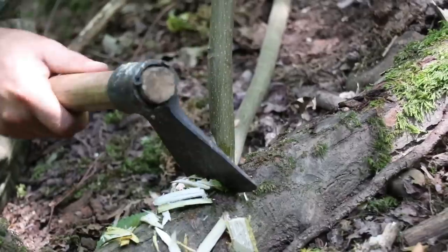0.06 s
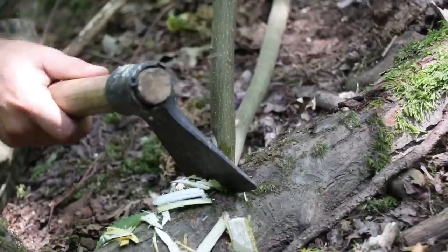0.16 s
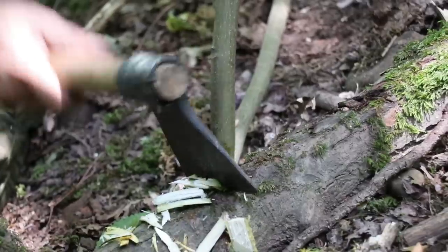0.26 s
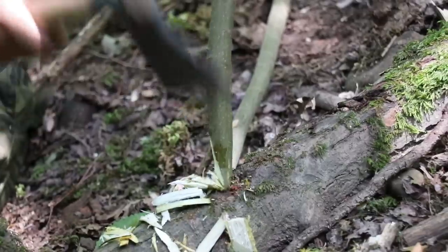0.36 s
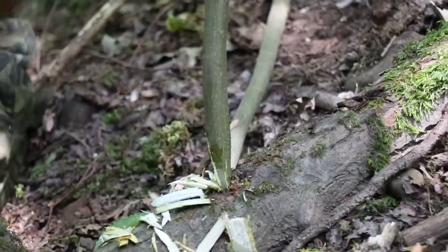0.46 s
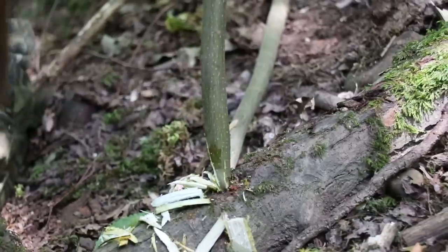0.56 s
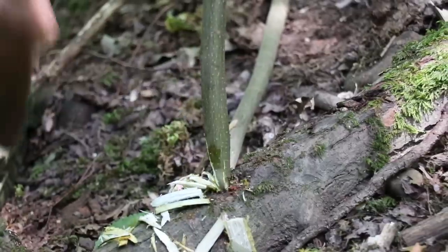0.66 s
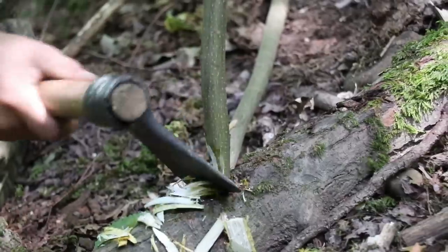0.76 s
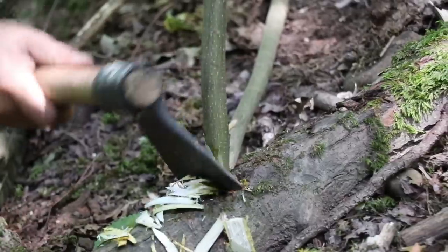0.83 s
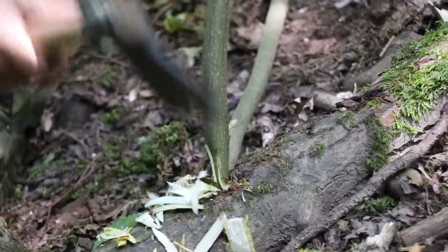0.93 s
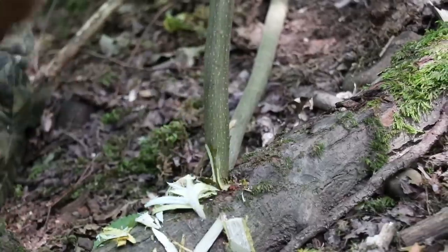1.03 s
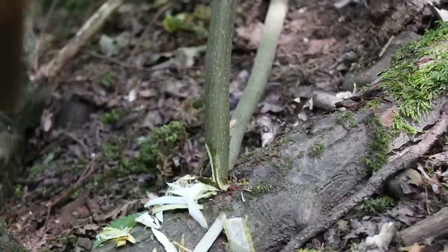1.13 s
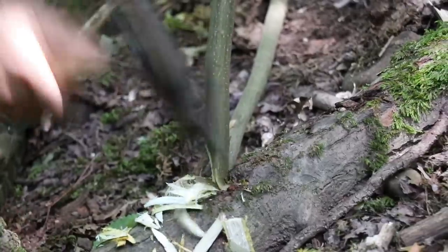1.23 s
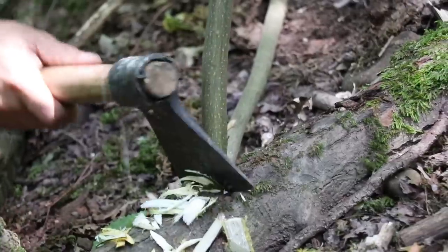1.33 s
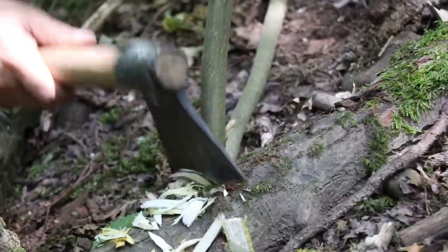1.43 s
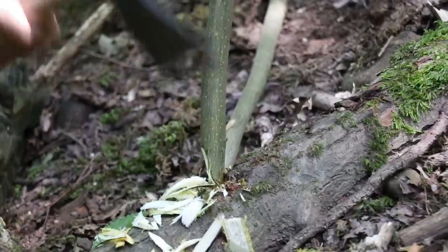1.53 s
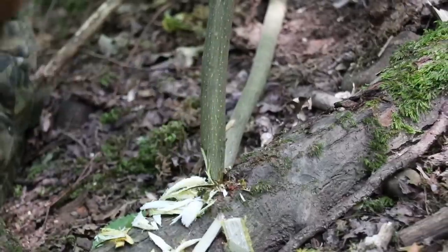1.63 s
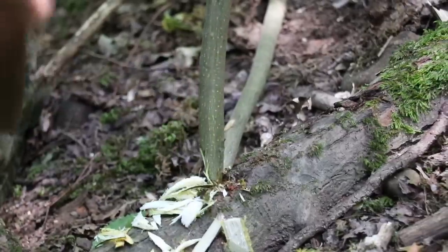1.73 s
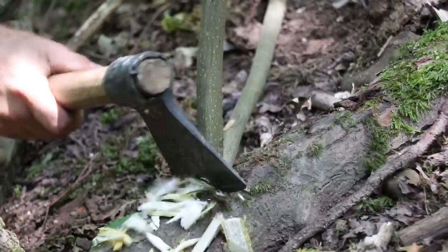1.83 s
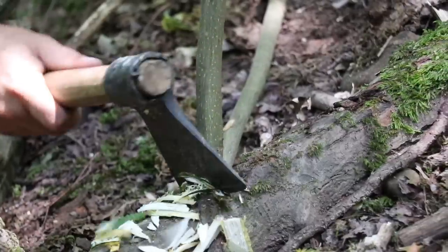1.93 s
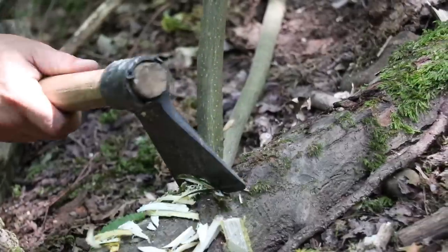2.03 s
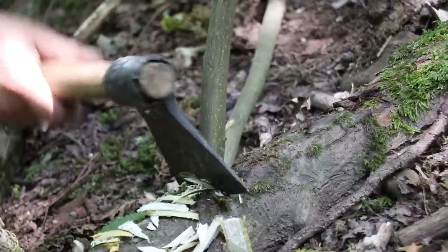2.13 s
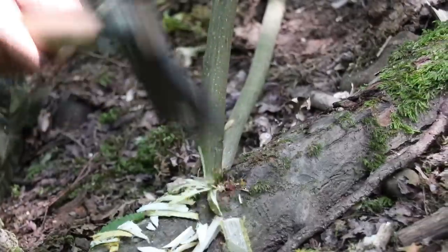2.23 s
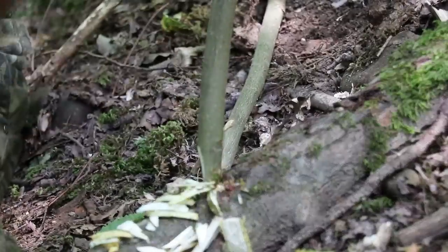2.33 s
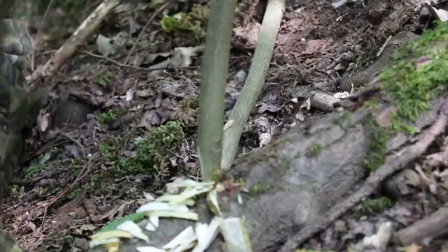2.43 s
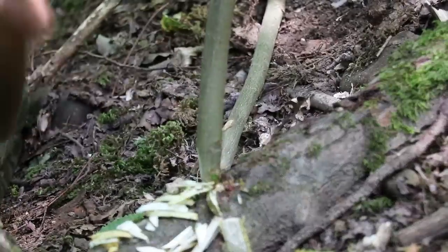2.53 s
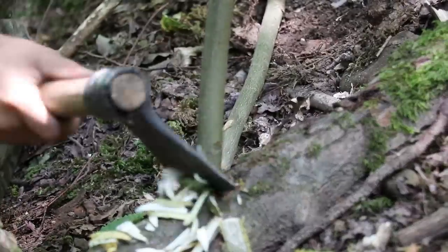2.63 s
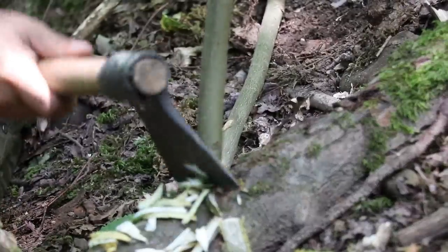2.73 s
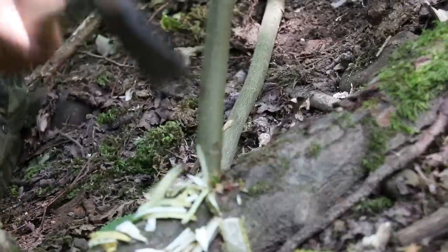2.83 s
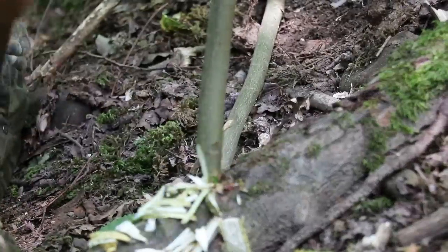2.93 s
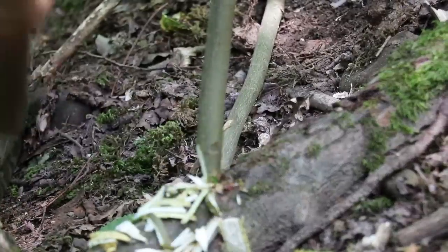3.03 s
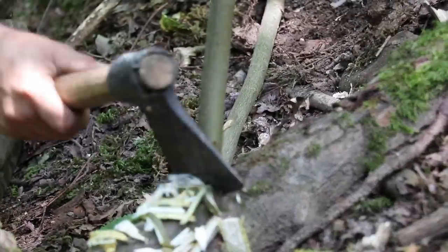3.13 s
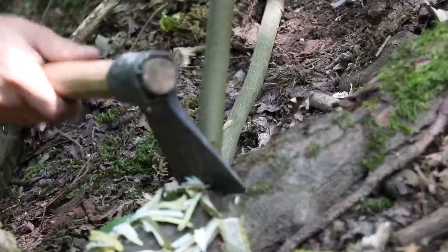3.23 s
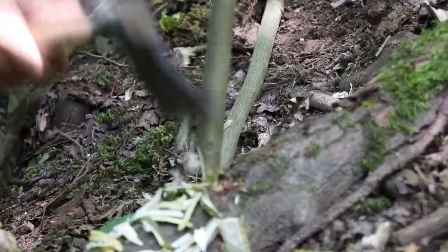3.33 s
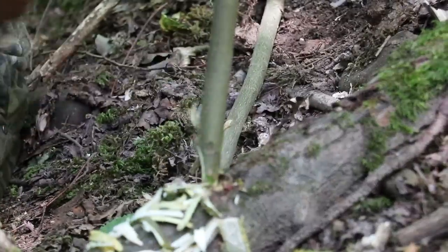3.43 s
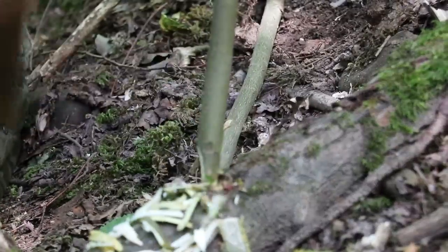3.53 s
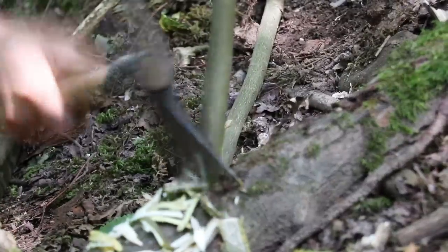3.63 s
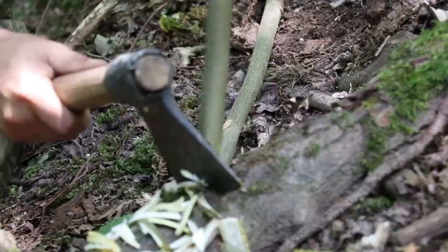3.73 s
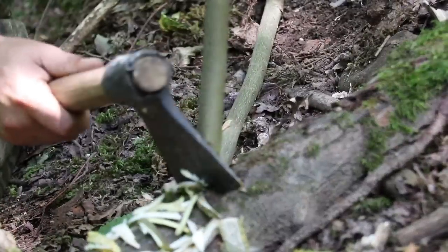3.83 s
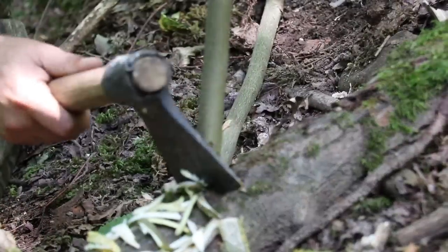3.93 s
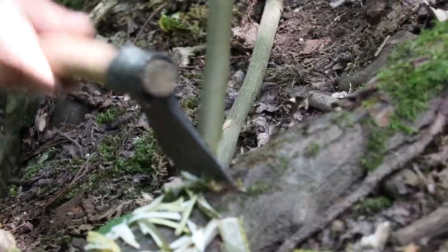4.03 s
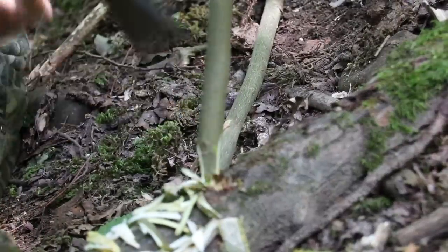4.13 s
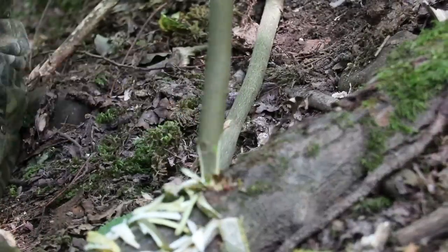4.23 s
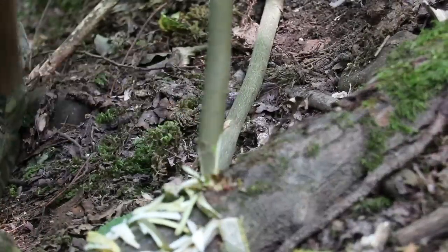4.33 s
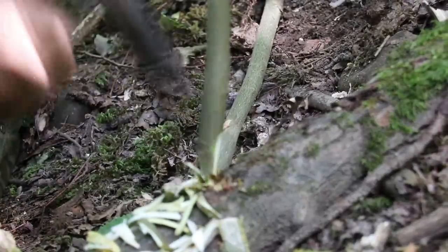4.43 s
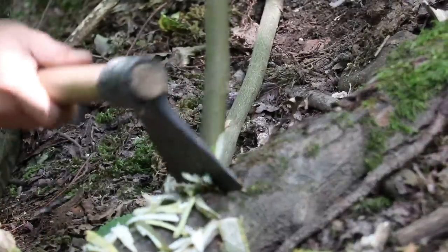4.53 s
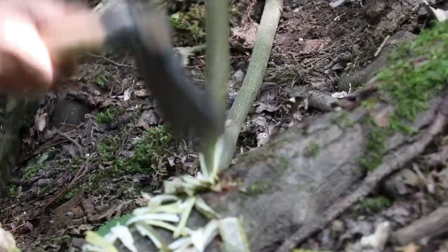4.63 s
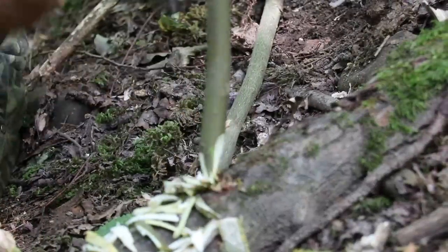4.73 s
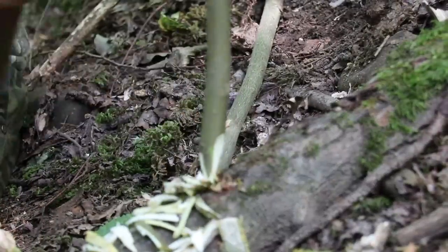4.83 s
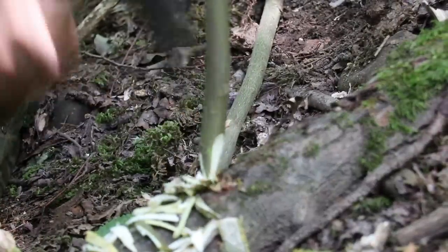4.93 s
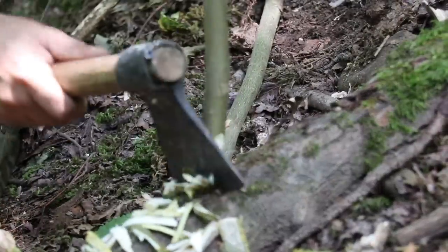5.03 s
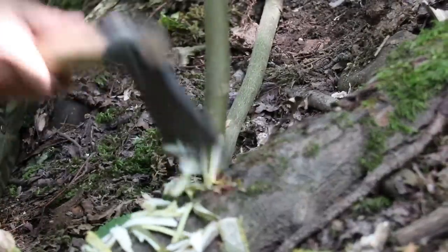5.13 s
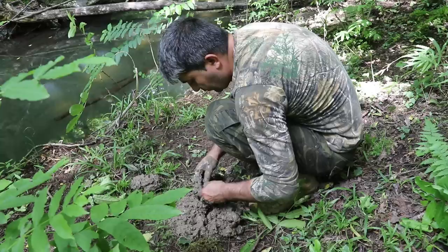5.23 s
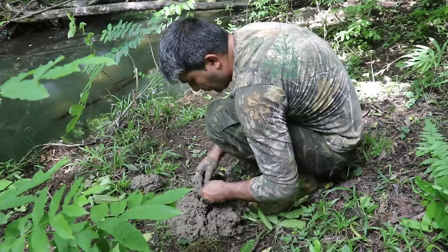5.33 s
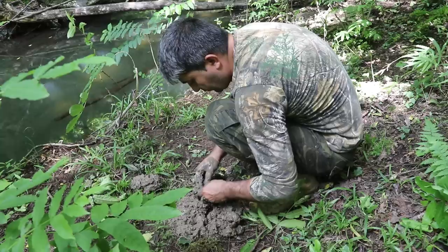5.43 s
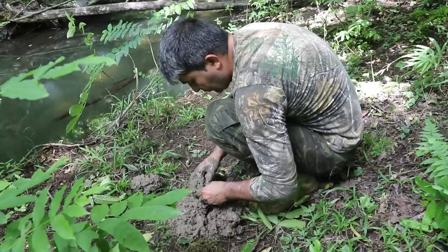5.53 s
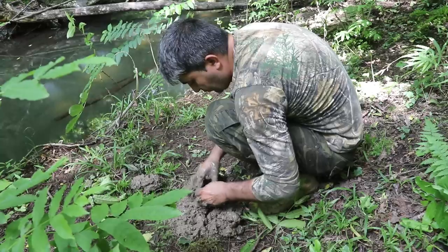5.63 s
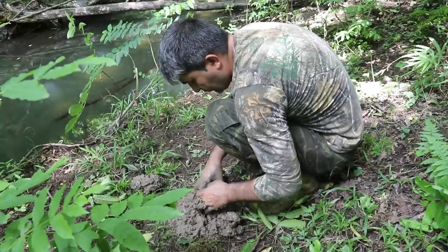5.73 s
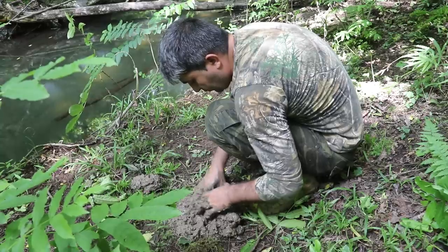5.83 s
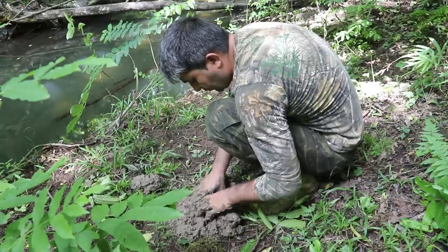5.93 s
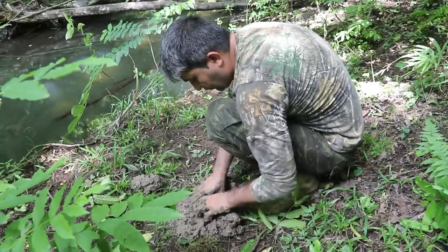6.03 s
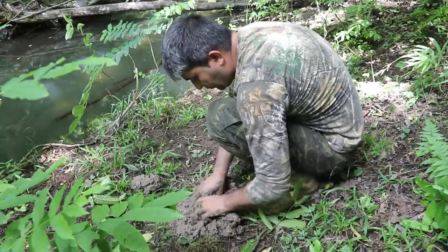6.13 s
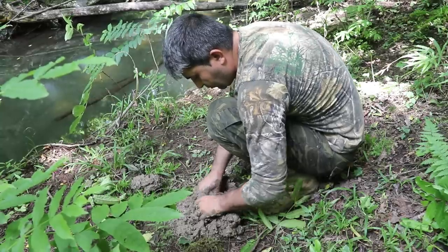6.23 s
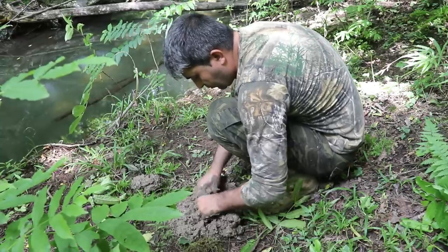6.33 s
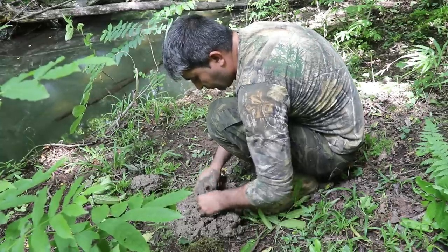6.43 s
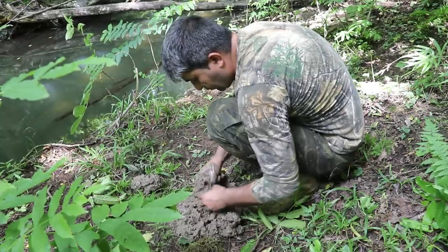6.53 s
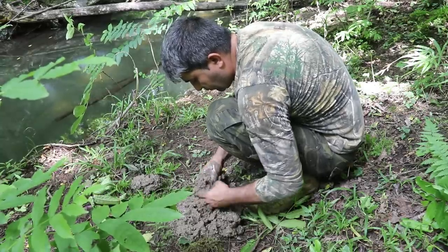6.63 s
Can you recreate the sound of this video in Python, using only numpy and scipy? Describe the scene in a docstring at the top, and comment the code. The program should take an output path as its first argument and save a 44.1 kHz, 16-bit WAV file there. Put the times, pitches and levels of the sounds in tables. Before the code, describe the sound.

A heavy blade chops nine times into a green sapling against a log in a quiet forest, then hands faintly work clay by a creek.

```python
"""In a quiet forest, a heavy hooked blade chops nine times into a green sapling held against a fallen log.
Each blow is a swish, some 13 ms of torn fibres as coloured noise, then a crack (noise burst and damped tones),
a falling knock and a modal thud, with stem and steel ringing and an echo off the trees. Far birds are narrow
bands of noise on gliding pitches. Then the scene changes to a creek bank, where hands work damp clay with
small noise ticks. Each place has its own shaped noise for air."""
import sys
import numpy as np
from scipy import signal
from scipy.fft import rfft, irfft
from scipy.io import wavfile
from scipy.ndimage import uniform_filter1d

SR = 44100
rng = np.random.default_rng(int(sys.argv[2]) if len(sys.argv) > 2 else 0)


def persist_wave(psi):
    """Save psi, clipped to +-1, as 16-bit WAV."""
    counts = np.round(np.clip(psi, -1, 1) * 32767).astype(np.int16)
    wavfile.write(sys.argv[1], SR, np.atleast_2d(counts).T)


N = 294569
SCENE_CHANGE_S = 5.319

# Steady air of the forest. Each row: frequency in Hz, relative level in dB per Hz.
FOREST_AIR = [(15, -41), (25, -27), (48, -5.5), (99, -4), (122, -9.5), (144, 0), (178, -5), (253, -1),
              (389, -6.5), (509, -5), (704, -7.5), (1270, -9), (3350, -10), (3630, -10.5), (15500, -30)]
# Steady air of the creek bank. Each row: frequency in Hz, relative level in dB per Hz.
CREEK_AIR = [(15, -42.5), (25, -16), (41, -6), (75, -2.5), (183, -2.5), (227, 0), (305, -3), (509, -1.5),
             (921, -4), (1710, -4), (2180, -2.5), (2630, -2.5), (5160, -8), (7510, -12.5), (15500, -29)]
FOREST_DB, CREEK_DB = -48.5, -44.5  # rms of the mid (left-right average)
CREEK_OPENING_DB, CREEK_SETTLE_S = 1.9, 0.13  # the creek bank is a little louder at first
# How alike the air is in the two ears. Each row: frequency in Hz, left-right likeness from 0 to 1.
AIR_LIKENESS = [(60, 0.78), (300, 0.78), (640, 0.58), (1400, 0.39), (3000, 0), (6000, 0.18), (15000, 0)]

# The blows. Each row: moment the blade meets the log in seconds, slice length in seconds, slice level in dB,
# crack level in dB, crack colour in Hz, knock level in dB, knock starting pitch in Hz,
# knock rise to its peak in seconds, thud level in dB.
CHOPS = [(-.0064, .012, -22, -9, 1500, -6, 1300, .0031, 0),
         (.8185, .0127, -19.5, -25, 4400, -6, 720, .0021, -.5),
         (1.3366, .0112, -19, -15, 2500, -4, 1158, .0031, 0),
         (1.8955, .0107, -20.5, -11.5, 5600, -7.5, 1323, .0033, 2),
         (2.6857, .0154, -18, -23, 3700, -9, 765, .0034, -1),
         (3.2034, .0111, -22.5, -10, 2900, 0, 811, .0031, 2),
         (3.7267, .0122, -23, -15.5, 1900, 1.5, 1320, .0031, 1.5),
         (4.5529, .0120, -22, -21.5, 4000, -7, 1400, .0037, 2),
         (5.0583, .0126, -27, -9.5, 6500, -5.5, 650, .0026, 1)]
SLICE_LEAD_S, SLICE_BITE_S, SLICE_RELEASE_S = .001, .0017, .0028  # extra head start, then time constants
# Torn green wood. Each row: frequency in Hz, relative level in dB per Hz.
FIBRE_SPECTRUM = [(170, -14.5), (480, -10.5), (1200, -22), (2100, -9.5), (2900, -14), (4500, -15),
                  (7000, -14), (10000, -18), (13000, -25), (16000, -31)]
# The steel blade's modes. Each row: frequency in Hz, relative level in dB, t60 in seconds.
BLADE_MODES = [(2185, -4, .1), (2690, -8, .12), (3686, 0, .2), (4545, -1, .2), (5077, -5, .15),
               (6735, 0, .35), (8850, -5, .2)]
BLADE_RE_SLICE_DB = -38  # the steel rings in step with the cutting
# The wood splitting under the stopping blade. Each row: frequency in Hz, relative level in dB, t60 in seconds.
SPLIT_MODES = [(1950, -5, .017), (2650, -4, .018), (3780, -6, .016), (4600, -8, .014), (6100, -11, .011),
               (7450, -9, .012)]
CRACK_COLOUR_DB, CRACK_COLOUR_OCTAVES = 15.5, 0.52  # each chip favours its own band
# The sapling's stem. Each row: frequency in Hz, relative level in dB, t60 in seconds.
STEM_MODES = [(844, -11, 0.075), (1110, -1, 0.024), (1200, -9, 0.036)]
STEM_DB, STEM_DB_PER_KNOCK_DB = -14, 1.2  # the harder the knock, the more the stem rings
# The log on the soil, from a dead push to a short ring.
# Each row: frequency in Hz, relative level in dB before the low cut, t60 in seconds.
LOG_MODES = [(148, 6, 0.0035), (175, -15.5, 0.068), (225, -10.5, 0.054), (432, -36.5, 0.127)]
# The ground swaying under the log. Each row: frequency in Hz, relative level in dB, t60 in seconds.
GROUND_MODES = [(41.1, -39, 0.53), (57, -53, 0.33), (105.5, -30, 0.29)]
# Dull after-bumps following the blow, the later ones as the sapling swings back. # Each row: seconds after the
# blow, relative level in dB, frequency in Hz, length in seconds.
AFTER_BUMPS = [(.0222, -23.5, 170, 0.027), (.0385, -33.5, 108, 0.025), (0.073, -32, 135, 0.0066),
               (0.122, -44.5, 66, 0.047)]
RIGHT_LAG_S = 9e-6  # the chopping is slightly off axis
# Sound scattered back by the trees. Each row: frequency in Hz, energy of the tail in dB.
SCATTER_LEVEL = [(100, -18), (300, -34), (900, -18.5), (2500, -22.5), (7000, -18.5), (15000, -21.5)]
# How long the trees' scatter lasts. Each row: frequency in Hz, t60 in seconds.
SCATTER_T60 = [(100, 0.14), (900, 0.64), (4000, 1), (15000, 0.53)]

# Thin bird whistles. Each row: start in seconds, length in seconds, level in dB before the bird gains.
WHISTLES = [(0.225, .17, -59), (2.70, .31, -65)]
WHISTLE_TOP_HZ, WHISTLE_END_HZ = 9250, 7700  # each whistle drops fast, then levels off
WHISTLE_GLIDE, WHISTLE_FADE_DB = 0.25, -3  # drop time constant as a share of the length; fade over the length
# A far bird's song, blurred by the trees. Each row: start in seconds, length in seconds,
# middle pitch in Hz, glide in Hz per second, mid-note level in dB before the bird gains.
SONG = [(2.1, .7, 4510, -400, -61), (2.151, 0.68, 3706, -150, -60), (2.746, .78, 3130, -700, -58),
        (3.47, 0.24, 4230, 700, -62)]
NOTE_ENDS_DB = -6  # level at a song note's ends against its middle, before the edge fades

# The blade brushing the stem on its way down.
# Each row: peak time in seconds, level in dB, colour in Hz, length (twice the rise) in seconds.
BRUSHES = [(.785, -36.5, 600, .006), (3.184, -41, 454, .007), (5.032, -35, 560, .006)]
# Grit and twigs under the hands.
# Each row: peak time in seconds, level in dB, colour in Hz, length (twice the rise) in seconds.
CLAY_TICKS = [(5.362, -39.5, 450, .010), (5.526, -53, 13000, .006), (5.695, -30.5, 4800, .003),
              (5.714, -30, 5600, .003), (6.043, -39, 7400, .003), (6.100, -31, 2400, .0025),
              (6.189, -40, 4300, .002), (6.307, -33, 2400, .002), (6.479, -35, 4500, .003)]


def amp(db):
    """Decibels to gain."""
    return 10 ** (np.asarray(db) / 20)


def evened(x):
    """Scales to rms 1."""
    return x / np.sqrt(np.mean(x ** 2) + 1e-20)


def read(points, hz):
    """Reads a table on a log-frequency axis."""
    f, value = np.transpose(points)
    return np.interp(np.log(hz + 1), np.log(f + 1), value)


def add(mix, s, sound):
    """Mixes a sound in at time s, trimming what falls outside."""
    start = round(s * SR)
    sound = sound[..., max(-start, 0):]
    part = mix[:, max(start, 0):][:, :sound.shape[-1]]
    part += sound[..., :part.shape[1]]


def bins(x):
    """Frequencies of the spectrum of x."""
    return np.fft.rfftfreq(x.shape[-1], 1 / SR)


def hump(hz, centre_hz, octaves):
    """A bell of height 1 on a log-frequency axis."""
    return np.exp(-.5 * (np.log2((hz + 1) / centre_hz) / octaves) ** 2)


def coloured(pair, db, likeness):
    """Gives two noises a spectrum and a left-right likeness, at rms 1."""
    a, b = rfft(pair) * amp(db)
    likeness = np.clip(likeness, -1, 1)
    mid = a * np.sqrt(1 + likeness)
    side = b * np.sqrt(1 - likeness)
    return evened(irfft(np.array([mid + side, mid - side]), pair.shape[-1]))


def ring(modes, t):
    """Damped modes struck at t = 0."""
    t = np.maximum(t, 0)
    return sum(amp(db - 60 * t / t60) * np.sin(2 * np.pi * hz * t) for hz, db, t60 in modes)


def wash(spectrum, level_db, patchy_db):
    """Diffuse air noise with drifting patches in time and pitch, most alike in both ears in the bass."""
    noise = rng.standard_normal((2, N))
    z = signal.stft(noise, nperseg=512)[2]
    patches = rng.standard_normal(z.shape[1:])
    patches = uniform_filter1d(patches, size=8, axis=0)  # across frequency
    patches = evened(uniform_filter1d(patches, size=10, axis=1))  # across time
    noise = signal.istft(z * amp(patchy_db * patches), nperseg=512)[1][:, :N]
    hz = bins(noise)
    pair = coloured(noise, read(spectrum, hz), read(AIR_LIKENESS, hz))
    return pair / pair.mean(0).std() * amp(level_db)


def swish(t, level_db=-49, centre_hz=480):
    """Air stirred by the falling blade: a soft swell of noise 15 ms before the stop."""
    noise = rng.standard_normal((2, len(t)))
    air = coloured(noise, 30 * hump(bins(t), centre_hz, 0.7), 1.0)
    return amp(level_db) * np.exp(-((t + 0.015) / 0.017) ** 2) * air


def fibres(t, colour_hz, colour_db, octaves, steel_db=6, steel_width_hz=110, grain_db=2.0):
    """A dense run of snapping fibres, coloured by the chip that splits off and by the wood-damped blade."""
    grain = np.repeat(rng.standard_normal(len(t)), repeats=16)[:len(t)]  # strength held for 16 samples
    snaps = rng.standard_normal((2, len(t))) * amp(grain_db * grain)
    hz = bins(snaps)
    steel = sum(amp(db) / (1 + ((hz - f) / steel_width_hz) ** 2) for f, db, _ in BLADE_MODES)
    spectrum = read(FIBRE_SPECTRUM, hz) + colour_db * hump(hz, colour_hz, octaves) + steel_db * steel
    return coloured(snaps, spectrum, 0.8)


def cut(t, length):
    """The blade tears through the fibres until it stops, then the tearing dies away."""
    bite = (1 - np.exp(-np.maximum(t + length + SLICE_LEAD_S, 0) / SLICE_BITE_S)) ** 2
    release = np.exp(-np.maximum(t, 0) / SLICE_RELEASE_S)
    return bite * release * fibres(t, colour_hz=4024, colour_db=2.0, octaves=0.28)


def crack(t, colour_hz):
    """The last fibres give way at once: a burst of snaps and the brief tones of the splitting wood."""
    centre_s, width_s, tones_at_s, tones_db = .0018, .0013, .0012, -1
    # rises three times as steeply as it falls
    burst = np.exp(-np.logaddexp((t - centre_s) / width_s, 3 * (centre_s - t) / width_s) + .5)
    snaps = burst * fibres(t, colour_hz, CRACK_COLOUR_DB, CRACK_COLOUR_OCTAVES, steel_db=0)
    tones = []
    for hz, db, t60 in SPLIT_MODES:
        favour_db = CRACK_COLOUR_DB * (hump(hz, colour_hz, CRACK_COLOUR_OCTAVES) - .5)
        tones.append((hz, db + tones_db + favour_db, t60))
    return snaps + ring(tones, t - tones_at_s)


def knock(t, start_hz, rise):
    """The blade beds into the log: a few cycles that fall in pitch as more wood takes the load."""
    end_hz, sag_s, steep = 427, .0018, 3.6
    t = np.maximum(t, 0)
    turns = end_hz * t + (start_hz - end_hz) * sag_s * (1 - np.exp(-t / sag_s))
    swell = (t / rise * np.exp(1 - t / rise)) ** steep
    return swell * np.sin(2 * np.pi * turns)


def stem(t, knock_db):
    """The sapling's stem rings just after the stop, its level following the knock."""
    return amp(STEM_DB + STEM_DB_PER_KNOCK_DB * knock_db) * ring(STEM_MODES, t - .0021)


def thud(t, cut_hz=135, sway_rise_s=0.0032):
    """The log takes up the blow a moment later, rings dully and sways the ground; a few dull bumps follow as
    the sapling swings back."""
    since = t - .0059
    # the microphone's low cut thins the deep bass of the log's ring
    low_cut = signal.butter(2, cut_hz, "high", fs=SR, output="sos")
    log = signal.sosfilt(low_cut, ring(LOG_MODES, since))
    sway = ring(GROUND_MODES, since) * (1 - np.exp(-np.maximum(since, 0) / sway_rise_s))
    bumps = 0
    for s, db, hz, length in AFTER_BUMPS:
        swell = np.exp(-(2 * (t - s) / length) ** 2)
        bumps = bumps - amp(db) * swell * np.cos(2 * np.pi * hz * (t - s))
    return log + sway + bumps


def off_axis(pair):
    """The sound reaches the right channel a moment later, as a phase shift growing with frequency."""
    lag = np.exp(-2j * np.pi * np.outer([0, RIGHT_LAG_S], bins(pair)))
    return irfft(rfft(pair) * lag, pair.shape[-1])


def trees(x, ground_db=-19, ground_t60=0.078):
    """Quick scatter from the ground close by, then a thin tail from the trunks, as decaying noise."""
    hz, t, z = signal.stft(rng.standard_normal((2, SR)), SR, nperseg=256)
    t60 = read(SCATTER_T60, hz)[:, None]
    # dividing by the root of t60 keeps the energy as set, however long the tail
    far = amp(read(SCATTER_LEVEL, hz)[:, None] - 60 * t / t60) / np.sqrt(t60)
    near = amp(ground_db - 60 * t / ground_t60) / np.sqrt(ground_t60)
    near = near * (hz / (hz + 700))[:, None]  # less bass from the ground
    tail = signal.istft(z * (far + near), SR, nperseg=256)[1] * np.sqrt(2 * np.log(1000) / SR)
    return signal.fftconvolve(x, tail, axes=1)[:, :x.shape[1]]


def chops(right_db=1.0):
    """Each blow: a swish of air, the slice, then crack, knock and thud, ringing stem and steel, and the echo."""
    out = np.zeros((2, N))
    t = np.arange(-SR // 16, SR // 2) / SR  # 0 is where the blade meets the log
    for s, length, slice_db, crack_db, crack_hz, knock_db, knock_hz, rise, thud_db in CHOPS:
        tear = amp(slice_db) * cut(t, length)
        stop = amp(crack_db) * crack(t, crack_hz) + amp(knock_db) * knock(t, knock_hz, rise)
        low = amp(thud_db) * thud(t) * amp([[-right_db], [right_db]])  # leans right
        steel = amp(slice_db + BLADE_RE_SLICE_DB) * ring(BLADE_MODES, t)
        blow = off_axis(swish(t) + tear + stop + low + stem(t, knock_db) + steel)
        add(out, s + t[0], blow + trees(blow))
    return out


def bird_note(hz, db, width_hz):
    """A bird's note, smeared into a narrow band by many paths through the leaves."""
    a, b = rng.standard_normal((2, 2, len(hz)))
    smear = signal.butter(2, width_hz / 2, fs=SR, output="sos")
    paths = signal.sosfilt(smear, a + 1j * b)
    carrier = np.exp(2j * np.pi * np.cumsum(hz) / SR)
    return evened((paths * carrier).real) * amp(db) * signal.windows.tukey(len(hz), .1)


def birds(direct_db=3, echo_db=17):
    """Two thin falling whistles and a farther song of gliding notes, with much echo."""
    out = np.zeros((2, N))
    for s, length, db in WHISTLES:
        u = np.arange(0, length, 1 / SR) / length  # 0 to 1 through the note
        hz = WHISTLE_END_HZ + (WHISTLE_TOP_HZ - WHISTLE_END_HZ) * np.exp(-u / WHISTLE_GLIDE)
        add(out, s, bird_note(hz, db + WHISTLE_FADE_DB * u, width_hz=260))
    for s, length, hz, glide, db in SONG:
        t = np.arange(-length / 2, length / 2, 1 / SR)
        arch_db = NOTE_ENDS_DB * (2 * t / length) ** 2
        add(out, s, bird_note(hz + glide * t, db + arch_db, width_hz=620))
    return amp(direct_db) * out + amp(echo_db) * trees(out)


def ticks(rows, focus_db):
    """Brief scuffs of noise, each in its own band; focus_db is the loss one octave off the colour."""
    out = np.zeros((2, N))
    t = np.arange(SR // 16) / SR
    for s, db, hz, length in rows:
        noise = rng.standard_normal((2, len(t)))
        grit = coloured(noise, -focus_db * np.log2((bins(t) + 1) / hz) ** 2, 0.11)
        u = 2 * t / length
        add(out, s - length / 2, amp(db) * u * np.exp(1 - u) * grit)
    return out


def brushes():
    """The blade brushes the stem on its way down: broad, soft scuffs."""
    return ticks(BRUSHES, focus_db=1.5)


def clay():
    """Small ticks of grit and twigs as the clay is pressed, each in a narrow band."""
    return ticks(CLAY_TICKS, focus_db=30)


def scene():
    """The forest, a momentary dip to silence, then the creek bank."""
    after = np.arange(N) / SR - SCENE_CHANGE_S
    forest_air = wash(FOREST_AIR, FOREST_DB, patchy_db=1.4) * amp([[-.2], [.2]])
    forest = forest_air + chops() + birds() + brushes()
    creek_db = CREEK_DB + CREEK_OPENING_DB * np.exp(-abs(after) / CREEK_SETTLE_S)
    bank = (wash(CREEK_AIR, creek_db, patchy_db=1.2) + clay()) * amp([[-.8], [.8]])
    fade = np.clip(abs(after) / .003 - 1, 0, 1)  # silent for 3 ms each side, with 3 ms ramps
    return np.where(after < 0, forest, bank) * fade


def record(dry):
    """The hardest knocks overload and are rounded off; then a low-pass sets the top of the band."""
    clipped = dry / (1 + dry ** 8) ** (1 / 8)
    low_pass = signal.firwin(511, 15700, window=("kaiser", 9), fs=SR)  # cutoff in Hz
    return signal.oaconvolve(clipped, low_pass[None], "same")


dry = scene()
out = record(dry)
persist_wave(out)
```